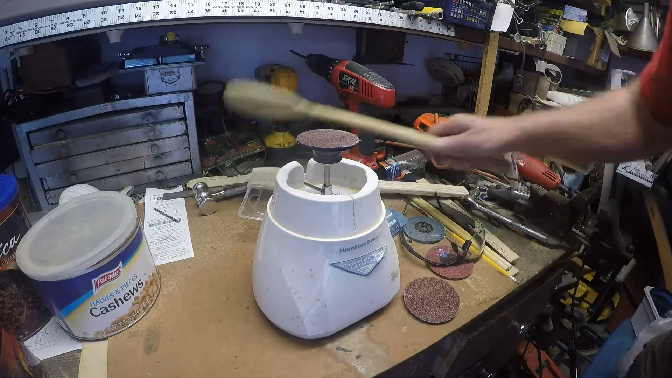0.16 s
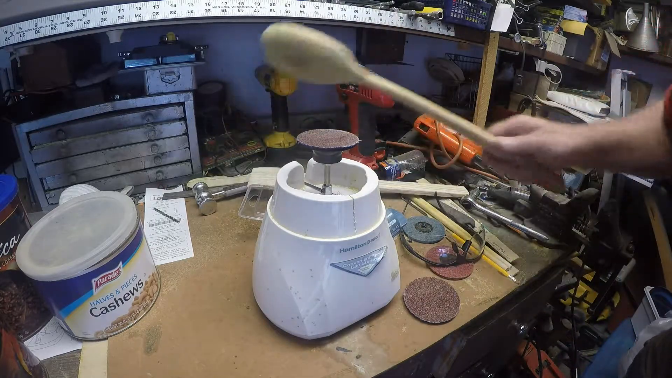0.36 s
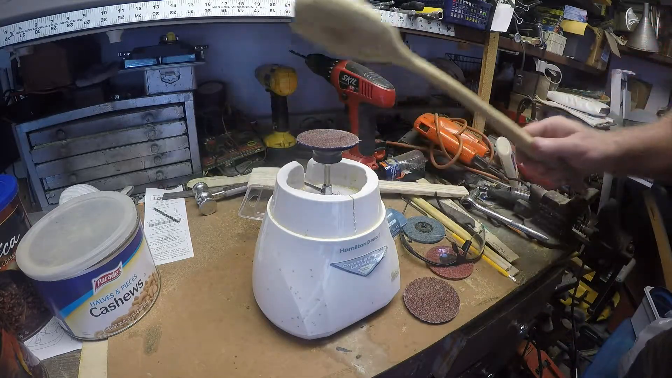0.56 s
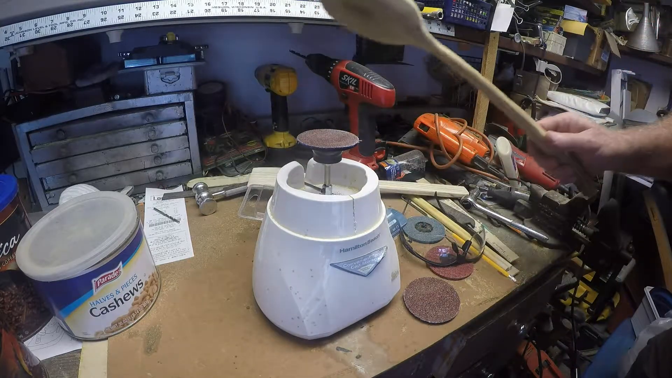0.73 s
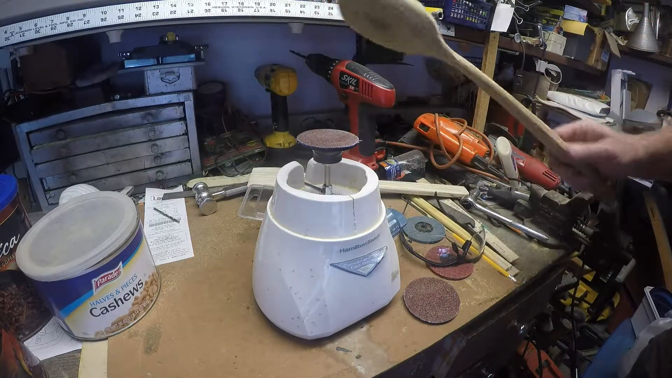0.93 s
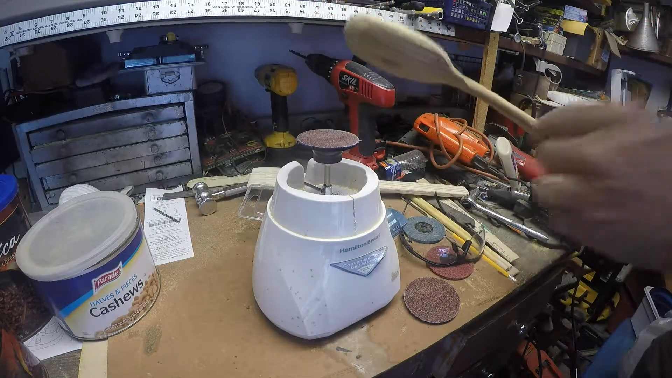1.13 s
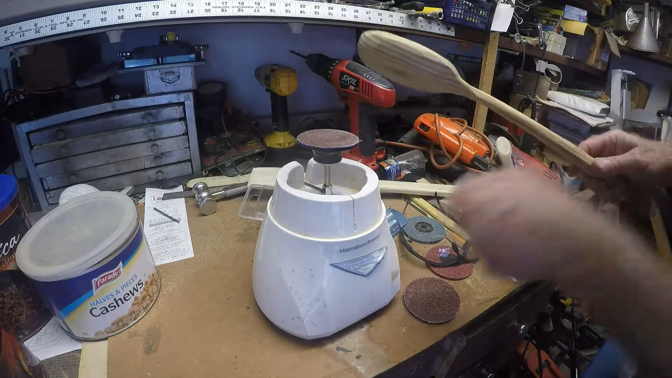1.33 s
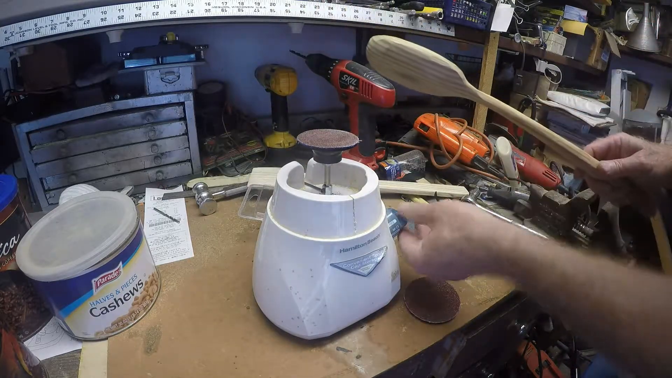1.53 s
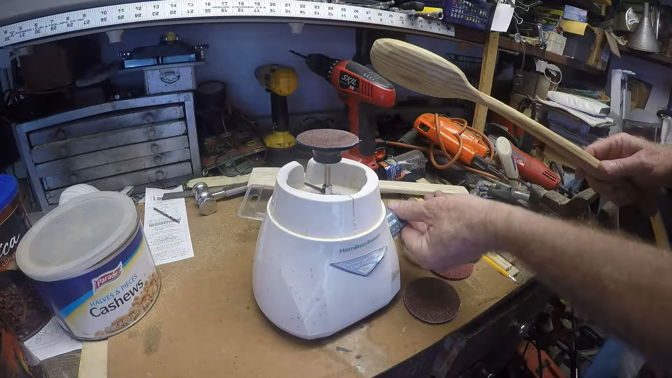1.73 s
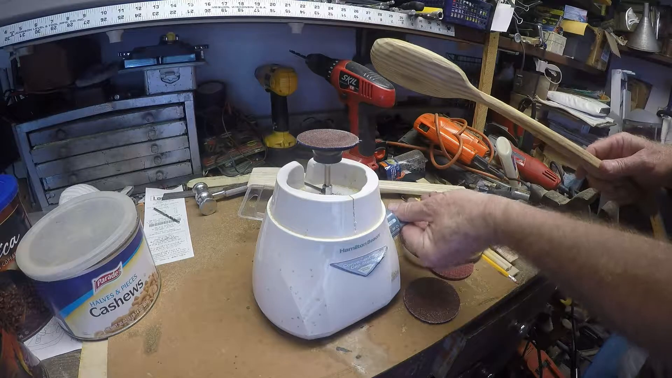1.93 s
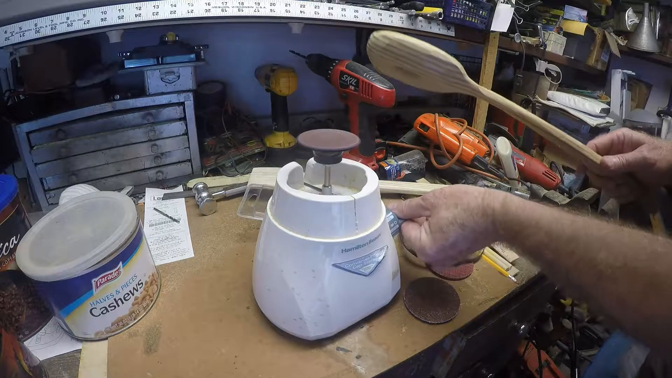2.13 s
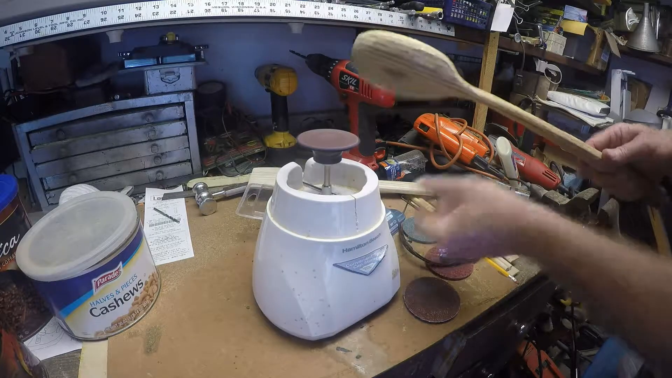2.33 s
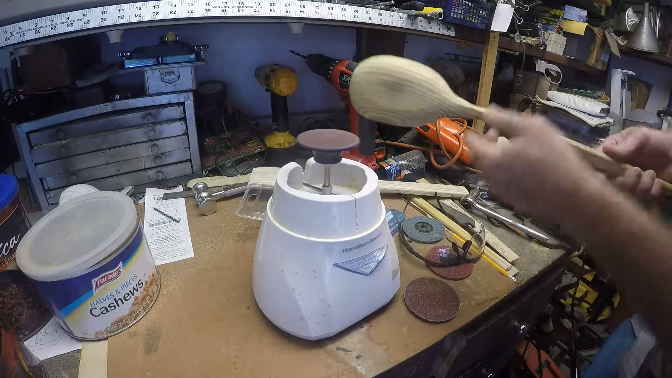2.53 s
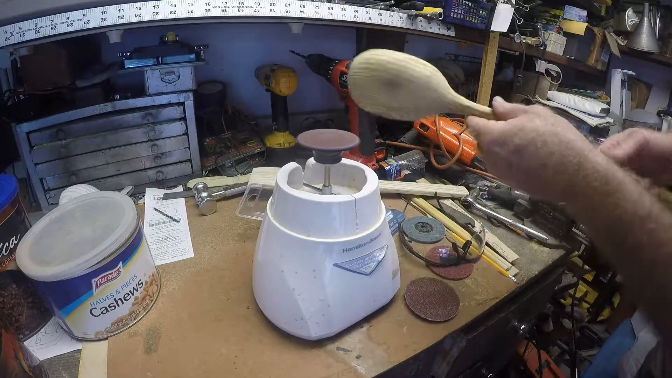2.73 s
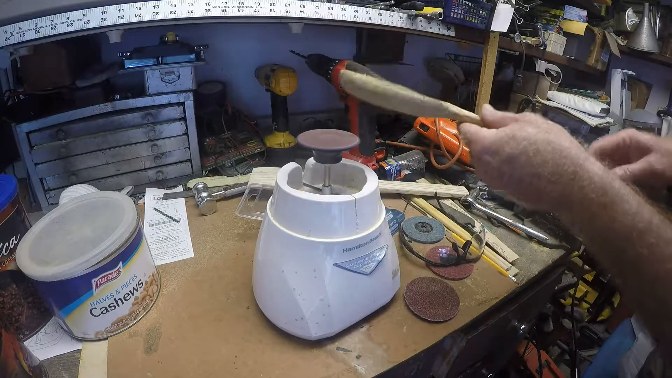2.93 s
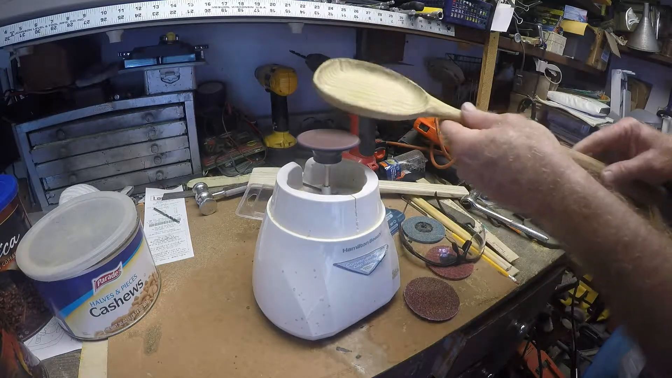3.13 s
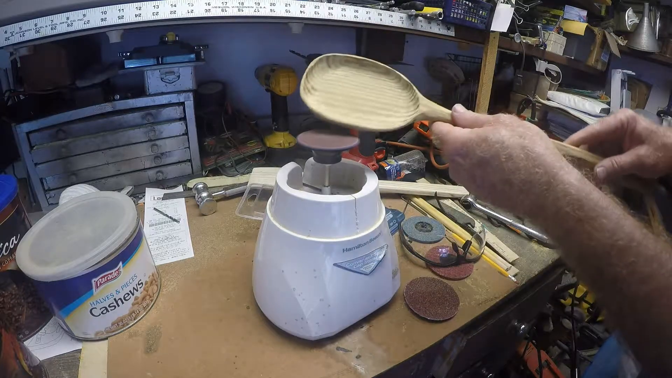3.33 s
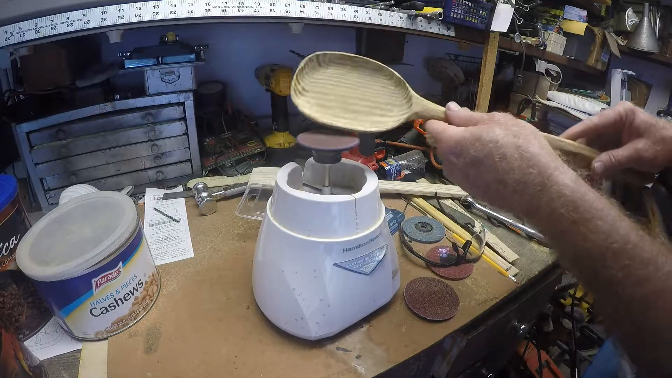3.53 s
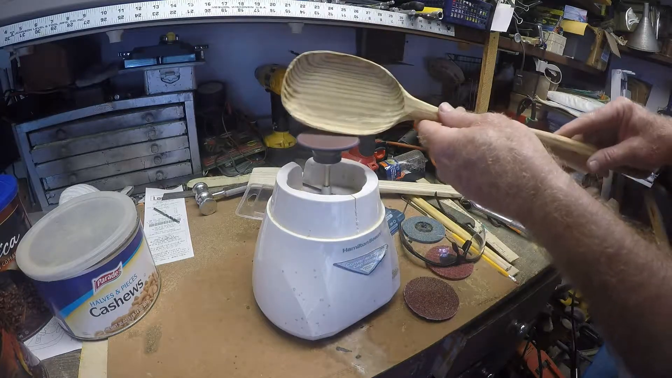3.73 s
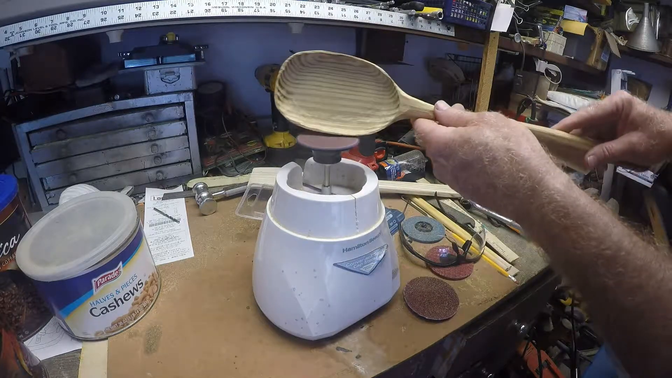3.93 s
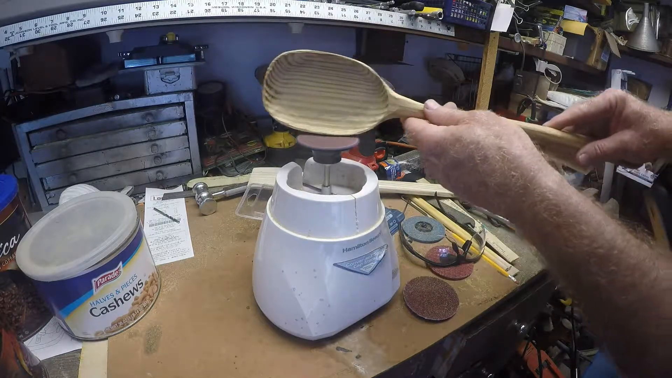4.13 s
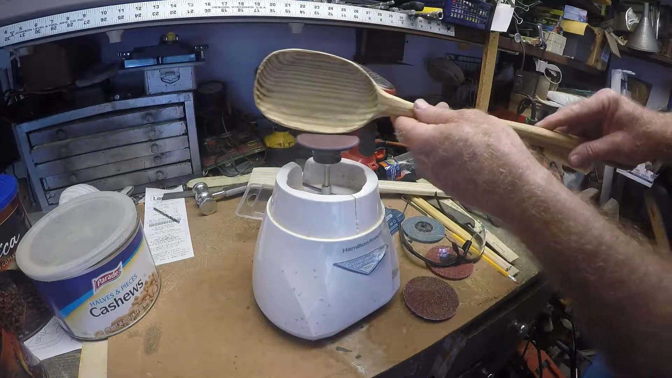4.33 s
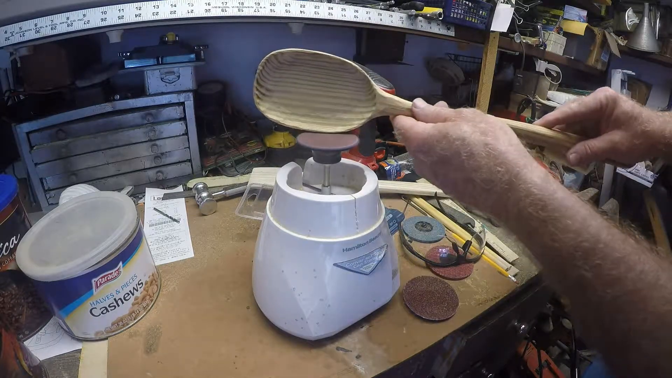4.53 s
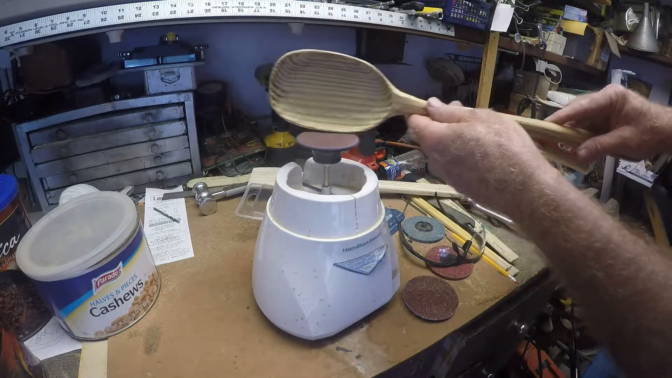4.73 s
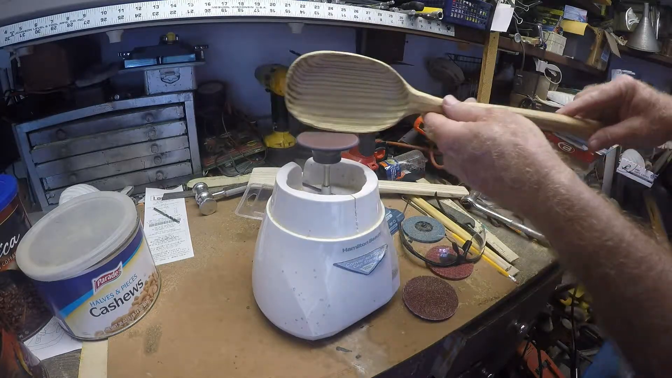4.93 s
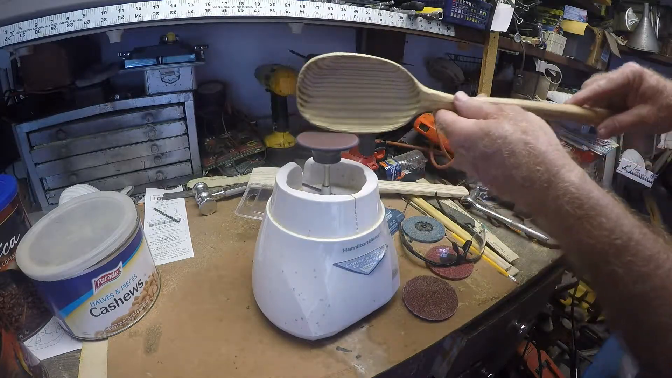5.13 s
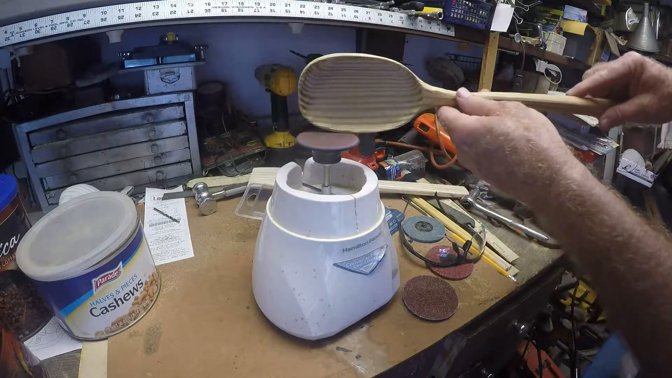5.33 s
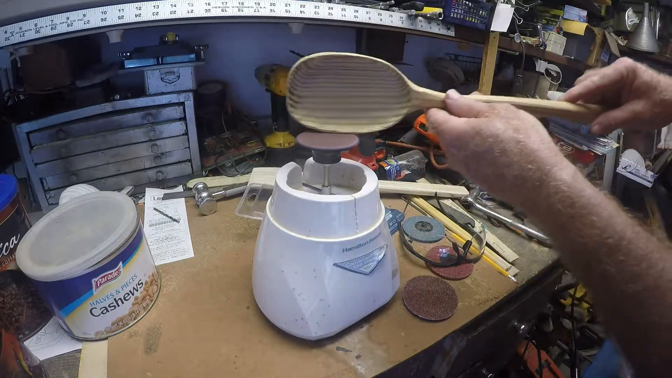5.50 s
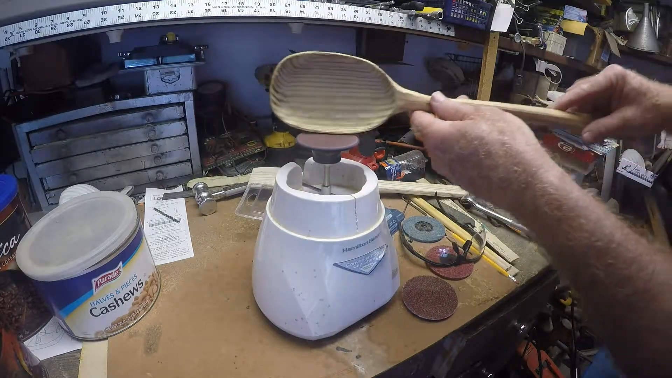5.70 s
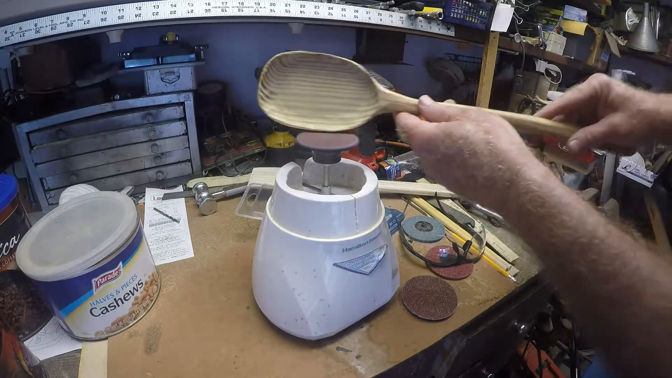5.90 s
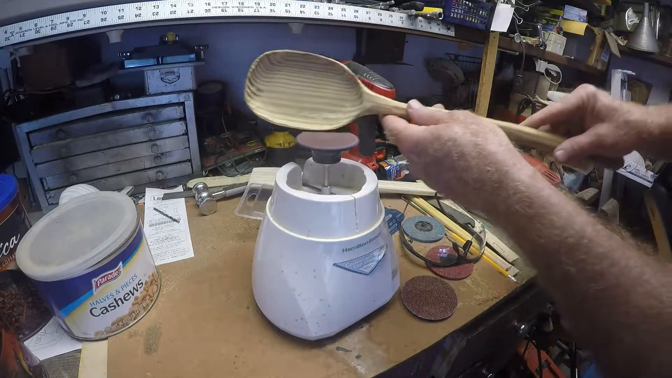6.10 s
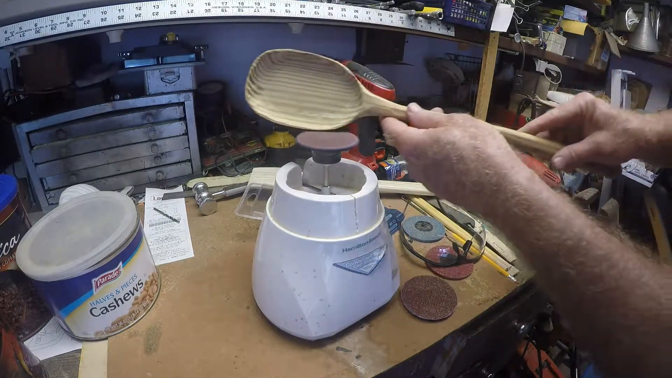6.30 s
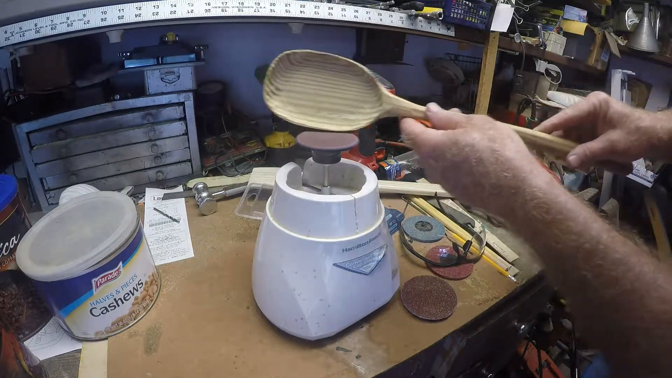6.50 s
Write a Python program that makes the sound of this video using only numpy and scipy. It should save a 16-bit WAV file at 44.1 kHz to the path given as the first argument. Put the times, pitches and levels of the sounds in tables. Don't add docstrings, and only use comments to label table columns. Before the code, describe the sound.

After two seconds of low ventilation hum, a small brush motor buzzes and revs up fast, then gritty, fluttering sanding of a wooden spoon begins.

```python
import sys
import numpy as np
from scipy import signal
from scipy.fft import rfft, irfft, next_fast_len
from scipy.io import wavfile

SR = 44100
rng = np.random.default_rng(int(sys.argv[2]) if len(sys.argv) > 2 else 0)


def field_ratio(decibels):
    return 10 ** (np.asarray(decibels, dtype=float) / 20)


def unload_audio(sound):
    columns = np.transpose(np.atleast_2d(sound))
    steps = np.round(np.clip(columns, -1, 1) * 32767)
    wavfile.write(sys.argv[1], SR, steps.astype(np.int16))


N = 289296

MAINS_HZ, SWITCH_ON_S = 60, 1.9925
FULL_SPEED = 205.8

# [t/s, speed lost/(turns per s)]
DRAG = [
    (3.8, 0),
    (4.3, .4),
    (4.6, 1.4),
    (5.0, 3),
    (5.4, 2),
    (5.6, 6),
    (5.75, 4.9),
    (6.05, 4.6),
    (6.4, 5.7),
]
# [level at full speed/dB, share of base resonance (0-1), level lost at standstill/dB]
LOW_ORDERS = [(-34, 0.89, 14), (-35.5, 1.0, 32), (-37, .9, 70)]
# [f/Hz, width/Hz, lift/dB]
BASE_RESONANCES = [(181.3, 7.5, 13), (260.4, 7.1, 21), (349, 12, 22), (368.7, 7.5, 24), (383, 6.7, 22)]
# [order (times shaft speed), mains offset/Hz, level/dB]
SIDEBANDS = [(1, -60, -34.5), (1, 60, -28.5), (1, 120, -40.5), (2, -120, -36), (2, -60, -39.5),
             (2, 58, -46), (3, -60, -41)]
# [f/Hz, level/dB]
STALL_HUM = [(60, -34), (120, -28.5), (180, -35), (360, -32)]
# [middle t/s, half length/s, level/dB]
BLADES = [
    (2.392, 0.057, -42),
    (2.628, .05, -40),
    (3.0, 0.11, -71),
    (4.16, 1, -32.5),
    (5.4, 0.075, -36),
    (6.153, 0.76, -35),
]
# [middle t/s, half length/s, level/dB]
BARS = [
    (2.62, 0.082, -41),
    (2.82, 0.21, -40),
    (3.2, 0.073, -32.5),
    (3.6, 0.23, -34),
    (4.0, 0.24, -46),
    (4.4, 0.29, -36.5),
    (5.0, 0.23, -29.5),
    (5.35, 0.11, -35.5),
    (6.15, 0.49, -35),
]
# [middle t/s, half length/s, level/dB]
SLOTS = [
    (2.23, 0.022, -40),
    (2.35, 0.017, -36),
    (2.5, 0.1, -38),
    (2.8, 0.21, -45),
    (4.0, 0.22, -56),
    (4.85, .15, -63),
]
# [order (times shaft speed), middle t/s, half length/s, level/dB]
SINGING = [(48, 2.26, .07, -45), (48, 2.38, .12, -50), (60, 2.27, .1, -57), (72, 2.2, .07, -57),
           (21, 6.15, .19, -30), (18, 5.62, .2, -28.5), (18, 4.87, .17, -36), (17, 4.45, .12, -39),
           (31, 3.95, .2, -36), (35, 3.9, .15, -38), (29, 4.5, .2, -38), (23, 4.8, .08, -38),
           (20, 6.35, .2, -36), (31, 6.35, .1, -39), (38, 4.0, .2, -41), (8, 4.6, .5, -40),
           (5, 5.58, .2, -35), (5, 3.5, .7, -46), (6, 3.4, .6, -46), (7, 4.3, .6, -43), (4, 2.31, .05, -34),
           (1, 2.215, .05, -17), (3, 2.265, .03, -19), (4, 3.05, .38, -41.5), (4, 5, 1.7, -42.5),
           (22, 4.8, .09, -36), (27, 3.95, .2, -39), (51, 3.95, .2, -46)]
# [t/s, peak level/dB]
KICKS = [
    (1.9927, -26),
    (2.0095, -16.5),
    (2.0272, -15.5),
    (2.0428, -17.5),
    (2.061, -19),
    (2.0934, -34),
    (2.1101, -36),
    (2.1287, -20),
]
# [middle t/s, half length/s, buzz added/dB, hiss added/dB]
SHUDDERS = [
    (1.996, .03, -7, 2),
    (2.36, 0.14, 7, 2),
    (2.74, 0.16, -3.5, -1.5),
    (4.434, 0.28, -0.5, 1.5),
    (4.79, 0.31, -2, 1),
    (5.352, 0.15, 0, 1.5),
    (5.69, 0.31, 2.5, 2),
]
# [f/Hz, level per Hz/dB]
BUZZ = [(40, -36), (110, -15.5), (180, -16), (280, -17.5), (355, 0), (440, -12.5), (490, -7), (570, -24),
        (700, -23), (1100, -27)]
# [f/Hz, level per Hz/dB]
HISS = [(450, -34), (700, -20), (950, -16), (1400, -7), (1900, -7.5), (2500, -5.5), (3200, -8),
        (4200, -8.5), (5400, -13.5), (6300, -15), (8100, -23.5), (10200, -27.5), (13800, -28.5),
        (15800, -40)]
# [f/Hz, width/Hz, level/dB]
HOUSING = [(1800, 150, -9), (2040, 130, -3), (2890, 160, -2.5), (3600, 200, -11), (4850, 200, -5),
           (6100, 300, -12)]
# [t/s, peak level/dB, f/Hz]
TICKS = [
    (2.141, -6.5, 595),
    (2.141, -31, 910),
    (2.139, -15, 1780),
    (2.188, -15.5, 780),
    (2.349, -13, 5300),
    (2.365, -31, 4950),
]
# [t/s, fine grit level/dB, flat-on tilt that favours coarse grit/dB]
PRESSURE = [(3.625, -48, -1), (3.64, -33.5, -1.5), (3.72, -44.5, 4.5), (3.75, -26.5, -9), (4.0, -38, 1),
            (4.15, -32, -9), (4.19, -53, 16.5), (4.27, -49, 2), (4.29, -37, -2), (4.4, -39.5, 5),
            (4.65, -43, 4.5), (4.8, -36.5, 2.5), (5.1, -36.5, 2.5), (5.3, -46.5, 3), (5.46, -30.5, -3.5),
            (5.59, -28, -3), (5.72, -41, 3), (6.5, -44.5, 9)]
# [f/Hz, level per Hz/dB]
GRIT = [(2500, -20), (3300, 4), (4400, 1), (6500, -1.5), (8500, -9), (10500, -14.5), (12500, -9.5),
        (14500, -11), (15800, -13)]
# [middle t/s, half length/s, f/Hz, width/Hz, level/dB]
PATCHES = [(3.84, 0.11, 5760, 1200, 3), (3.85, 0.09, 13700, 1190, -4), (3.813, 0.062, 11600, 800, 1),
           (3.995, 0.16, 9600, 1000, 2.5), (4.12, 0.033, 13300, 700, -15), (4.37, 0.028, 8400, 600, 11),
           (4.74, 0.044, 6000, 700, 5), (4.805, .09, 4440, 900, -2), (4.05, 0.091, 7830, 500, 4),
           (4.84, 0.068, 12100, 1100, 7), (4.83, 0.13, 9900, 500, 4), (5.05, .1, 14300, 1190, 4),
           (5.06, 0.048, 12200, 700, 6), (5.446, .06, 14200, 910, 3), (5.55, 0.047, 12500, 1200, 0),
           (5.55, 0.11, 7600, 1200, 0), (5.565, .07, 5050, 600, 4), (6.14, 0.19, 14600, 890, 15.5),
           (6.15, 0.19, 12100, 1250, 10)]
# [first t/s, last t/s, gap/s, peak level/dB]
BOUNCES = [
    (4.32, 4.357, .031, -24),
    (4.436, 4.672, .047, -21),
    (4.719, 4.834, .039, -21),
    (4.888, 5.205, .053, -22),
    (5.367, 5.484, .042, -23),
    (5.589, 5.719, .031, -22.5),
    (5.763, 5.798, .027, -20),
    (5.823, 6.134, .05, -21),
    (6.207, 6.412, .051, -25),
    (6.459, 6.545, .044, -18.5),
]
# [f/Hz, rms level/dB]
DRONE = [(75.4, -40), (150.7, -52), (226.1, -50.5), (301.5, -85), (452.2, -47.5), (678.3, -62.5),
         (829.0, -65), (979.8, -72)]
# [f/Hz, level per Hz/dB]
AIR = [(12, -50), (20, -2.5), (70, -6), (180, -12), (232, -8), (382, -12), (439, -8), (505, -16.5),
       (649, -14), (767, -26), (857, -21.5), (2760, -28.5), (3350, -34), (5090, -34), (15500, -62)]


def shaft():
    start_speed, run_up_s = 40, .34
    drag, = in_time(DRAG)
    since_s = np.maximum(np.arange(N) / SR - SWITCH_ON_S, 0)
    speed = FULL_SPEED - (FULL_SPEED - start_speed) * np.exp(-since_s / run_up_s) - drag
    return speed, drag


def rotor(speed, turns, drag):
    t = np.arange(N) / SR
    out = low_orders(speed, turns, drag)
    body = np.array(BUZZ)
    for order, hz, db in SIDEBANDS:
        lift_db = .5 * np.interp(round(order) * speed + hz, body[:, 0], body[:, 1])
        line_turns = round(order) * turns + round(hz / MAINS_HZ) * MAINS_HZ * t
        out += tone(line_turns, db + lift_db, wobble_db=1.5)

    span, bump = swell(2.1, 0.13)
    stall_hum = sum(tone(hz * t, db, wobble_db=0.0) for hz, db in STALL_HUM)
    out[span] += bump * stall_hum[span]

    unsteady_turns = turns + 0.0053 * drift(15)
    waver_db = 2.75 * drift(23)
    whine = []
    for order, rows in zip((10, 24, 36), (BLADES, BARS, SLOTS)):
        whine += [(order, *row) for row in rows]
    for order, mid_s, half_s, db in whine + SINGING:
        span, bump = swell(mid_s, half_s)
        waver = waver_db[::-1] if order % 2 else waver_db
        level = field_ratio(db + 5.5 + waver[span])
        out[span] += bump * level * np.sin(2 * np.pi * order * unsteady_turns[span])
    return out


def low_orders(speed, turns, drag):
    throb_depth, throb_onset = .42, 9
    brake_db = 1.01
    pulse = np.cos(2 * np.pi * MAINS_HZ * np.arange(N) / SR)
    upper = 1 + throb_depth * (speed / FULL_SPEED) ** throb_onset * pulse
    span, bump = swell(2.4, .05)
    upper[span] *= field_ratio(-8 * bump)
    out = 0
    for order, (db, share, start_db) in enumerate(LOW_ORDERS, 1):
        lift = 1
        for hz, width, top_db in BASE_RESONANCES:
            lift = lift + field_ratio(2 * top_db) / (1 + ((order * speed - hz) / width) ** 2)
        level_db = db + share * 10 * np.log10(lift)
        level_db = level_db - start_db * (1 - speed / FULL_SPEED) ** 2 - brake_db * drag / order ** 2
        out = out + tone(order * turns, level_db, wobble_db=1.0) * (1 if order == 1 else upper)
    return out


def motor_noise(speed):
    t = np.arange(N) / SR
    buzz_db, hiss_db, depth = effort(speed)
    cycles = np.maximum(t - SWITCH_ON_S, 0) * MAINS_HZ
    since = cycles % 1
    strength = field_ratio(2.5 * rng.standard_normal(400))[cycles.astype(int)]
    depth = np.clip(depth, 0, 1)
    pulse = 0.72 * strength * np.exp(-since / 0.5) * np.minimum(since / 0.11, 1)
    kick = 1 - depth + depth * pulse
    buzz = colour(rng.standard_normal(N) * kick, BUZZ)

    slams = field_ratio(-9) * bursts(KICKS, decay_s=0.004) * rng.standard_normal(N)
    slams = signal.sosfilt(signal.butter(2, 9000, fs=SR, output="sos"), slams)
    thud = field_ratio(11.0) * resonate(slams, 840, 460)

    powered = t > SWITCH_ON_S
    white = rng.standard_normal(N) * kick * powered * field_ratio(hiss_db + 0.72 * drift(10.4)) + slams
    ringing = sum(field_ratio(db) * resonate(white, hz, width) for hz, width, db in HOUSING)
    ringing_db = np.interp(t, [3.6, 4.5], [9, 3])
    hiss = colour(white + field_ratio(ringing_db) * ringing, HISS)

    arcing = signal.sosfilt(signal.butter(2, 7000, "high", fs=SR, output="sos"), rng.standard_normal(N))
    arcing *= field_ratio(-45) * np.interp(t, [2.05, 2.2, 2.8], [0, 1, .3])
    return thud + arcing + field_ratio(buzz_db - 11.5) * buzz + field_ratio(2.0) * np.std(white) * hiss


def effort(speed):
    share = speed / FULL_SPEED
    buzz_db = np.full(N, -16.0)
    hiss_db = 10 * np.log10(field_ratio(2 * -39.5) + field_ratio(2 * -22.5) * share ** (2 * 1.95))
    for mid_s, half_s, more_buzz_db, more_hiss_db in SHUDDERS:
        span, bump = swell(mid_s, half_s)
        buzz_db[span] += more_buzz_db * bump
        hiss_db[span] += more_hiss_db * bump
    throb_depth = 0.26 + 0.87 * (1 - share) ** 2
    return buzz_db, hiss_db, throb_depth


def ticks():
    white = rng.standard_normal(N)
    out = 0
    for s, db, hz in TICKS:
        blow = field_ratio(7.5) * white * bursts([(s, db)], decay_s=0.0065)
        out = out + resonate(resonate(blow, hz, 330), hz, 700)
    return out


def spoon(turns):
    t = np.arange(N) / SR
    high_db, tilt_db = in_time(PRESSURE)
    press_db = high_db + 37 + tilt_db
    low_db = -28.5 + press_db
    touch = np.clip((t - 3.6) / 0.018, 0, 1)
    dust = 0.37 * rng.standard_normal(N)
    plain = uneven(colour(grit(turns, memory=.95, arc=.08) + dust, GRIT), patchy_db=1.5)
    scrape = plain.copy()
    for mid_s, half_s, hz, width, db in PATCHES:
        span, bump = swell(mid_s, half_s)
        scrape[span] += field_ratio(db) * bump * resonate(resonate(plain[span], hz, width), hz, width)
    low = signal.sosfilt(signal.butter(4, 9000, fs=SR, output="sos"), scrape)
    high = signal.sosfilt(signal.butter(4, 9000, "high", fs=SR, output="sos"), scrape)

    blows = bounces()
    contact = field_ratio(low_db) * rms_one(low) + field_ratio(high_db) * rms_one(high)
    contact *= 1.04 + field_ratio(17.5) * bursts(blows, decay_s=0.0068)

    rub = field_ratio(-4 + press_db) * (t > 4.28)
    knocks = field_ratio(44.0) * bursts(blows, decay_s=0.000088) + rub * rng.standard_normal(N)
    modes = resonate(knocks, 908, 45) - resonate(knocks, 1030, 47) + 0.77 * resonate(knocks, 1078, 80)
    bowl = resonate(modes, 1130, 500)
    return touch * (contact + field_ratio(-12.0) * bowl)


def grit(turns, memory, arc, count=256):
    fresh = rng.standard_normal((1400, count))
    keep = np.clip(memory, 0, .99)
    disc = signal.lfilter([np.sqrt(1 - keep ** 2)], [1, -keep], fresh, axis=0)
    angle = turns % 1
    passing = disc[turns.astype(int), (angle * count).astype(int)]
    off = (angle + 0.052 * drift(1.9)) % 1 - .5
    return passing * (0.6 + np.exp(-(off / arc) ** 2))


def uneven(x, patchy_db):
    edges = np.geomspace(2400, 15900, 15)
    out = 0
    for k, pair in enumerate(zip(edges, edges[1:])):
        band = signal.sosfilt(signal.butter(2, pair, "band", fs=SR, output="sos"), x)
        out = out + (-1) ** k * field_ratio(patchy_db * drift(2.5)) * band
    return rms_one(out)


def bounces():
    blows = []
    for first, last, gap, db in BOUNCES:
        for s in np.linspace(first, last, round((last - first) / gap) + 1):
            blows.append((s, db + 0.5 * rng.standard_normal()))
    return blows


def shop():
    t = np.arange(N) / SR
    hum = sum(tone(hz * t + 0.037 * hz / 75 * drift(1), db, wobble_db=3.0) for hz, db in DRONE)
    return hum + field_ratio(-41 + 1.0 * drift(0.58)) * colour(rng.standard_normal(N), AIR)


def tone(turns, db, wobble_db):
    level = np.sqrt(2) * field_ratio(db + wobble_db * drift(7.1))
    return level * np.sin(2 * np.pi * (turns + rng.random()))


def resonate(x, hz, width):
    r = np.exp(-np.pi * width / SR)
    feedback = [1, -2 * r * np.cos(2 * np.pi * hz / SR), r * r]
    return signal.lfilter(np.array([1, 0, -1]) * (1 - r * r) / 2, feedback, x)


def colour(x, spectrum):
    size = next_fast_len(N)
    hz = np.maximum(np.arange(size // 2 + 1) * SR / size, 1)
    points = np.array(spectrum)
    db = np.interp(np.log(hz), np.log(points[:, 0]), points[:, 1], left=-80, right=-80)
    return rms_one(irfft(rfft(x, size) * field_ratio(db), size)[:N])


def drift(rate):
    r = np.exp(-80 * np.pi * rate / SR)
    slow = signal.lfilter([1], [1, -2 * r, r * r], rng.standard_normal(N // 40 + 2002))[2000:]
    return np.interp(np.arange(N) / 40, np.arange(len(slow)), rms_one(slow))


def swell(mid_s, half_s):
    start = max(int((mid_s - 2 * half_s) * SR), 0)
    stop = min(int((mid_s + 2 * half_s) * SR), N)
    offset = (np.arange(start, stop) / SR - mid_s) / half_s
    return slice(start, stop), np.exp(-(offset ** 2) ** 2)


def bursts(events, decay_s):
    hits = np.full(N, 1e-9)
    hits[[round(s * SR) for s, db in events]] = field_ratio(np.array(events)[:, 1])
    return signal.lfilter([1], [1, -np.exp(-1 / (decay_s * SR))], hits)


def in_time(rows):
    s, *columns = np.transpose(rows)
    return [np.interp(np.arange(N) / SR, s, column) for column in columns]


def rms_one(x):
    return x / np.sqrt(np.mean(x ** 2) + 1e-20)


def scene():
    speed, drag = shaft()
    on = np.clip((np.arange(N) / SR - SWITCH_ON_S) / .002, 0, 1)
    turns = np.cumsum(speed * on) / SR
    motor = on * (rotor(speed, turns, drag) + motor_noise(speed))
    mono = motor + ticks() + spoon(turns) + shop()
    return np.array([mono, mono])


def low_pass(x):
    return signal.sosfilt(signal.butter(12, 16260, fs=SR, output="sos"), x)


def record(dry):
    rounded = 0.89 * np.tanh(dry / 0.87)
    top_cut = signal.ellip(10, .3, 70, 15280, fs=SR, output="sos")
    mix = signal.sosfilt(top_cut, rounded)
    return low_pass(mix)


dry = scene()
out = record(dry)
unload_audio(out)
```